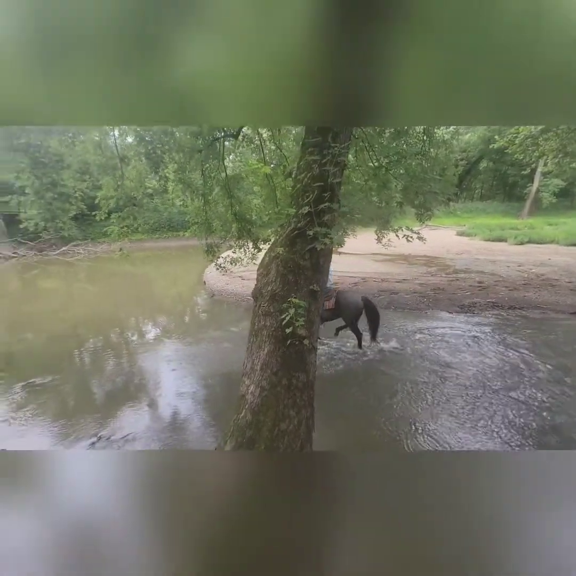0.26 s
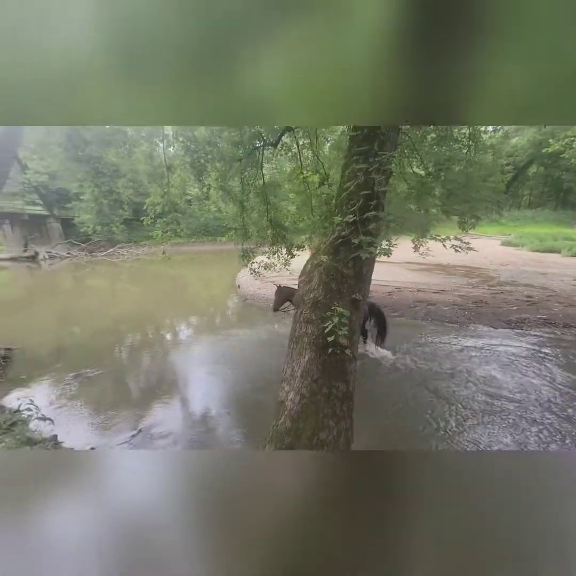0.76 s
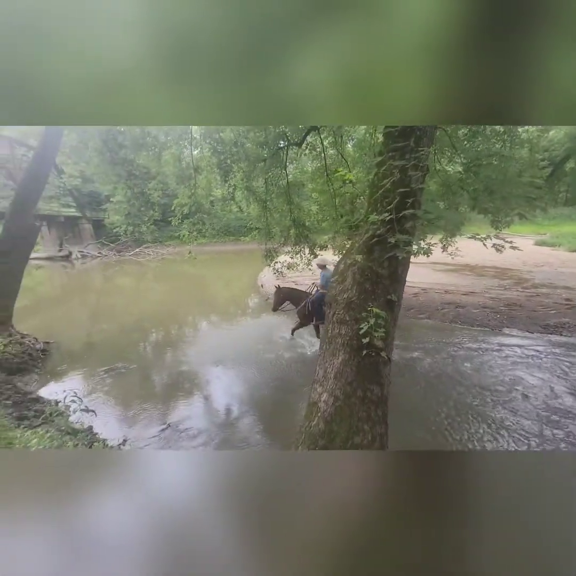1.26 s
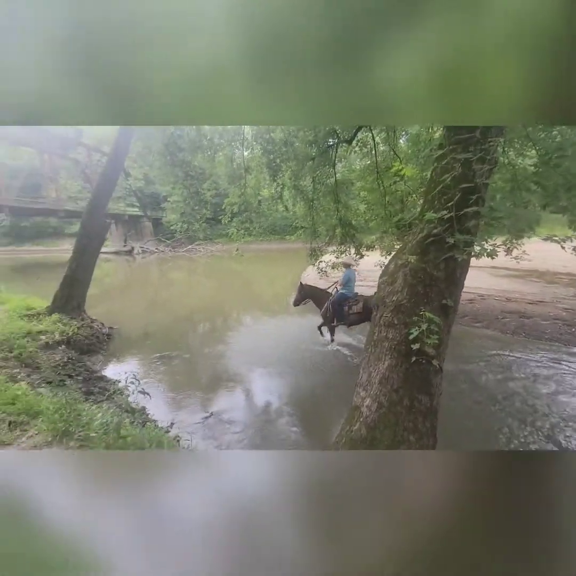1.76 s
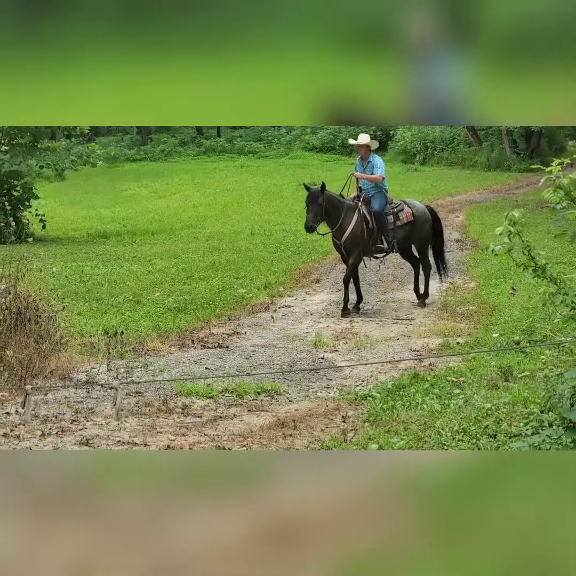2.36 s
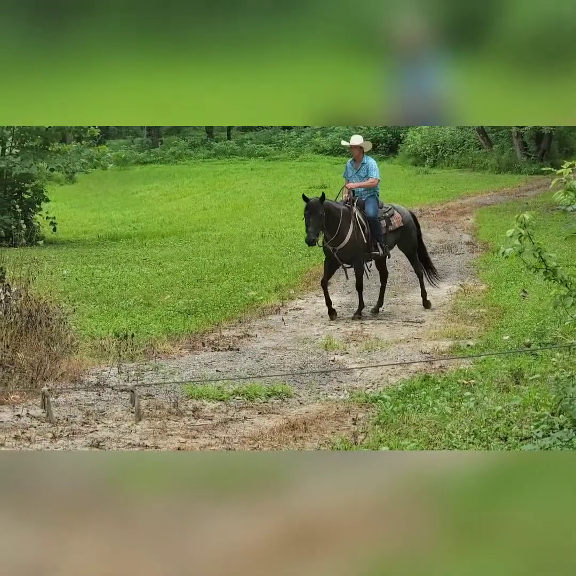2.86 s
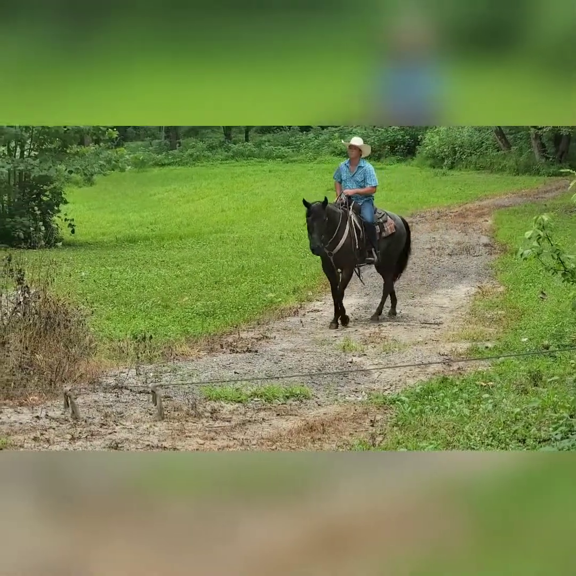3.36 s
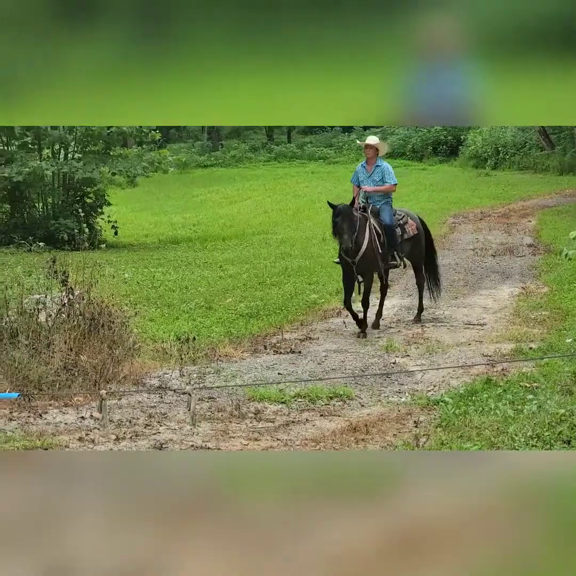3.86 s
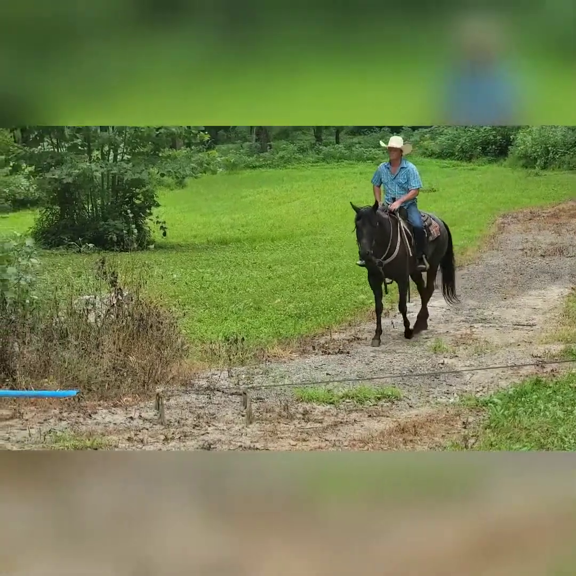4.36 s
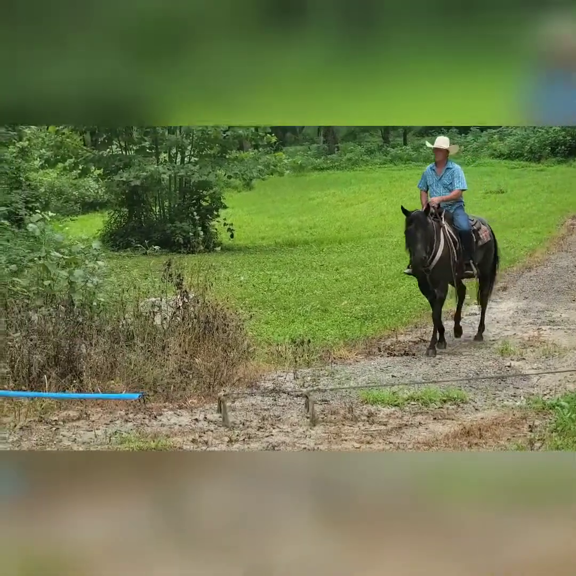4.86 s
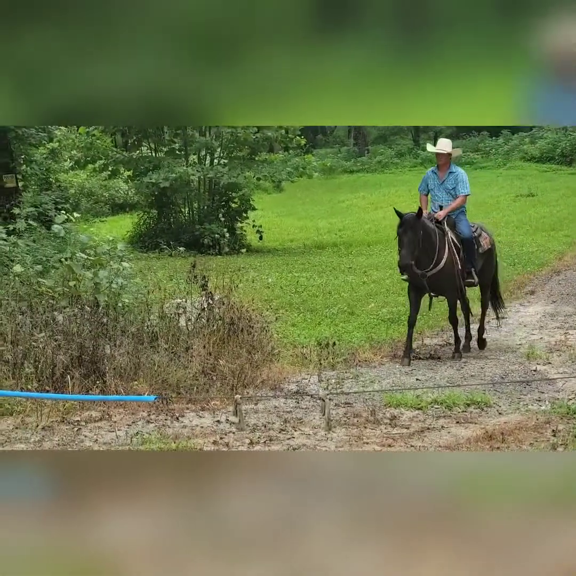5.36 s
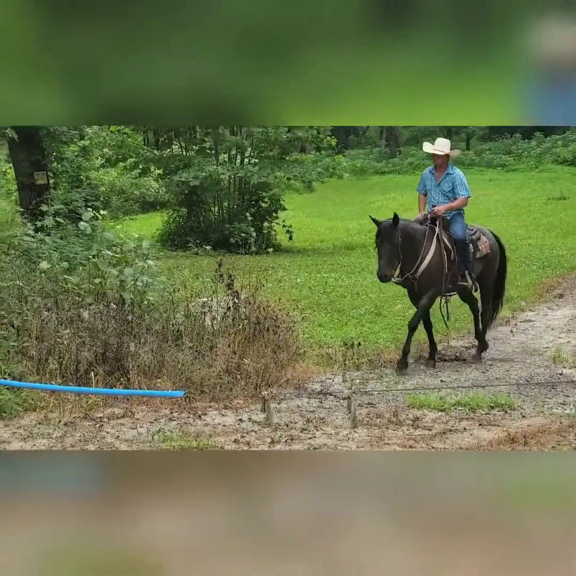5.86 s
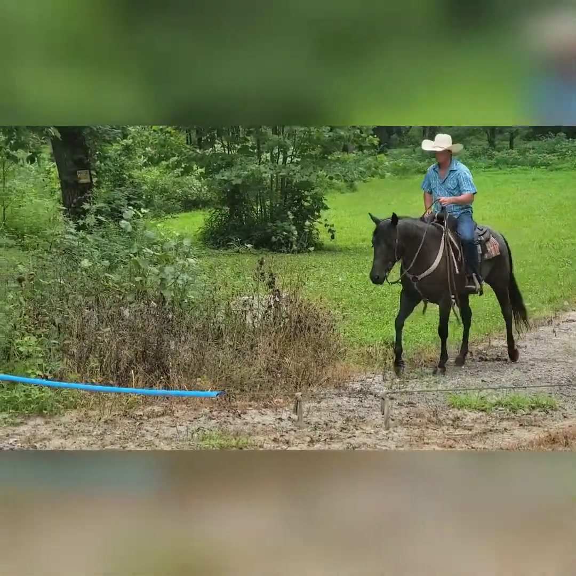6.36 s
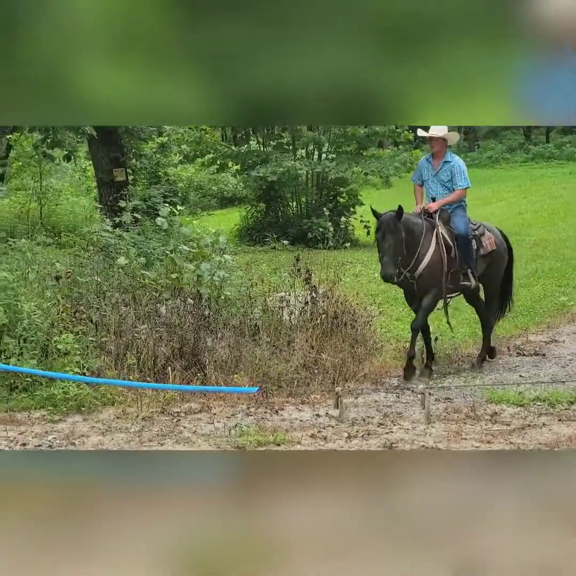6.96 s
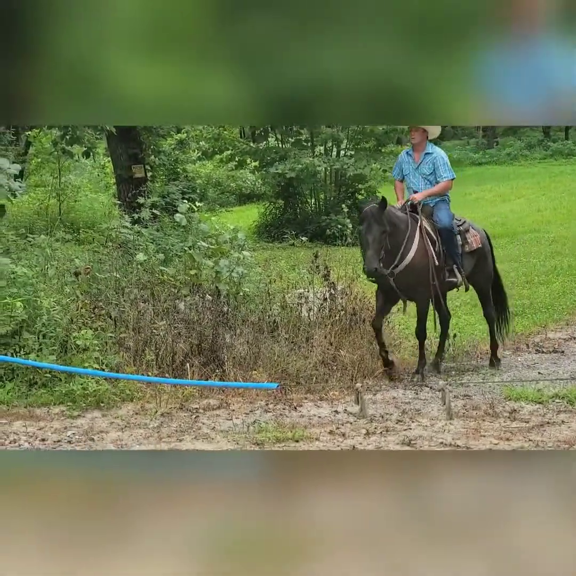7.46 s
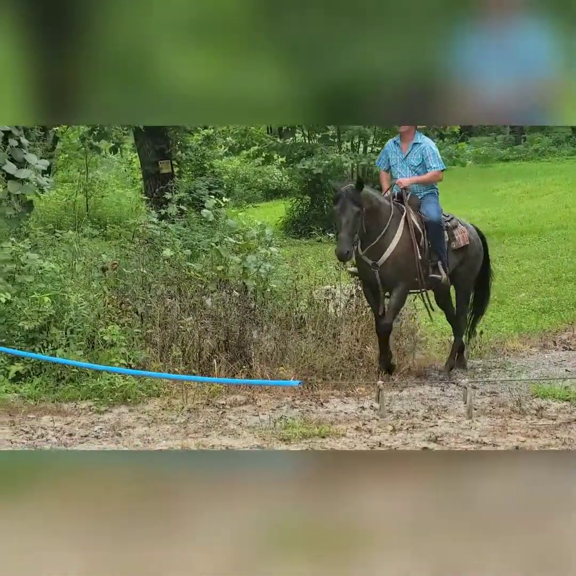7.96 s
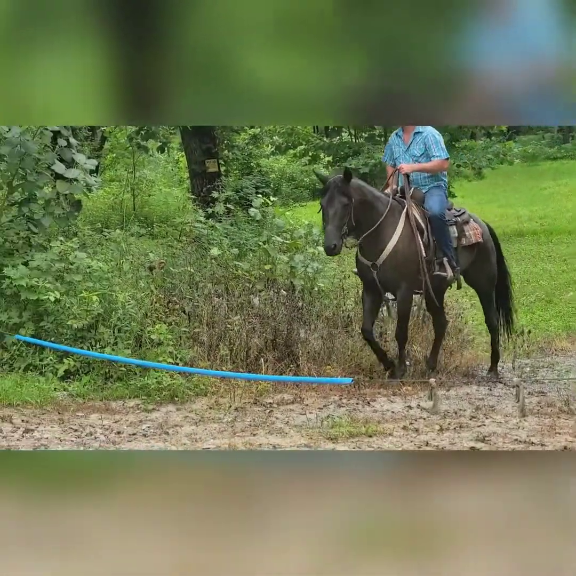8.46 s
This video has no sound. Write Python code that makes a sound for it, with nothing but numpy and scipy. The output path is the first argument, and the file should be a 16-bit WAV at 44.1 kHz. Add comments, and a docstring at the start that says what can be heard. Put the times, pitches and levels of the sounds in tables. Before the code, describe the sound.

Outdoors, a horse wades through a shallow creek with wide, busy splashes, hoof slaps, bubbly gulps and fizzing spray for nearly two seconds. A tiny silence follows, then much quieter, uneven hoof steps on a gritty dirt path grow closer and louder. A steady high insect buzz and faint distant engine rumble lie behind; stones snap, dry weeds brush, and a small bird whistles near the end.

```python
"""Horse from creek to path

A horse wades through a creek: bursts of coloured noise churn and spray, ringing bubbles gulp and fizz.
After a brief silence it walks up a gritty dirt path: each hoof is a crush of noise through resonances,
a short ring and a low thump, among snapping stones, scrapes and the noise of brushed dry weeds.
Pulsing noise makes the insects, low tones over a rumble a far engine, gliding sines a songbird and a hoot."""
import sys
import numpy as np
from scipy import signal
from scipy.fft import rfft, irfft, next_fast_len
from scipy.io import wavfile
from scipy.ndimage import uniform_filter1d, map_coordinates

SR = 44100
rng = np.random.default_rng(int(sys.argv[2]) if len(sys.argv) > 2 else 0)


def inscribe(sig):
    """Save sig as 16-bit PCM at rate SR to the path in sys.argv[1].

    A 1-D sig is mono; a 2-D sig holds one channel per row.
    Samples are clipped to [-1, 1] before scaling.
    """
    pcm = np.round(np.clip(np.atleast_2d(sig).T, -1, 1) * 32767)
    wavfile.write(sys.argv[1], SR, pcm.astype(np.int16))


N = 384536
CREEK_END_S, PATH_START_S = 1.799, 1.871


def amp(db):
    """Decibels to gain."""
    return np.exp(np.asarray(db) * np.log(10) / 20)


def unit(x):
    """Scale to rms 1."""
    return x / np.sqrt(np.mean(x ** 2) + 1e-20)


def along(points, hz):
    """Read a curve of (f/Hz, value) points on a log frequency axis."""
    f, v = np.transpose(points)
    return np.interp(np.log(hz + 1), np.log(f + 1), v)


def clock():
    """The time of each sample in seconds."""
    return np.arange(N) / SR


def wobble(rate):
    """A smooth random curve with rate knots a second."""
    s = np.arange(0, N, 16) / SR
    knots = rng.standard_normal(int(N * rate / SR) + 4)
    return np.interp(clock(), s, map_coordinates(knots, [s * rate]))


def filtered(x, response):
    """Multiply the spectrum of x by a response of frequency."""
    n = x.shape[-1]
    m = next_fast_len(n + SR // 8)
    return irfft(rfft(x, m) * response(np.fft.rfftfreq(m, 1 / SR)), m)[..., :n]


def resonances(modes, f):
    """Causal response of damped modes: (f/Hz, width/Hz, level/dB)."""
    return sum(amp(db) * 1j * f * w / (c * c - f * f + 1j * f * w) for c, w, db in modes)


def add(track, s, x):
    """Mix x into the track from time s; what falls outside is dropped."""
    start = round(s * SR)
    x = x[..., max(-start, 0):]
    part = track[..., max(start, 0):][..., :x.shape[-1]]
    part += x[..., :part.shape[-1]]


def noise():
    """Two channels of white noise."""
    return rng.standard_normal((2, N))


def grains(shape, rate, spread_db):
    """Random impulses of unequal size, about rate a second, rms 1."""
    hit = rng.random(shape) < rate / SR
    count = hit.size // 4
    size_db = spread_db * np.minimum(rng.exponential(size=count), 5)
    sizes = rng.standard_normal(count) * amp(size_db)
    out = np.zeros(shape)
    out[hit] = np.resize(sizes, hit.sum())
    return unit(out)


def spread(pair, spectrum, alike):
    """Colour two unrelated signals and blend them into left and right, rms 1."""
    def blend(hz):
        likeness = np.clip(along(alike, hz), -1, 1)
        return amp(along(spectrum, hz)) * np.sqrt([1 + likeness, 1 - likeness])
    mid, side = filtered(pair, blend)
    return unit(np.array([mid + side, mid - side]))


def swells(rows, rise, fall):
    """Power-summed gain of strokes that swell and die away: (peak t/s, level/dB, stretch in time)."""
    lead = 0.25  # each stroke is drawn from this many seconds before its peak
    power, t = np.zeros(N), np.arange(SR) / SR - lead
    for s, db, stretch in rows:
        age = np.where(t < 0, (t / (rise * stretch)) ** 2, t / (fall * stretch))
        stroke = amp(db) * np.exp(-np.minimum(age, 20))
        add(power, s - lead, stroke ** 2)
    return np.sqrt(power)


def cracks(rows, spectrum, life):
    """Short coloured noise bursts, each scaled to its peak: (t/s, level/dB)."""
    out, t = np.zeros(N), np.arange(SR // 12) / SR
    for s, db in rows:
        burst = rng.standard_normal(len(t)) * np.exp(-t / life) * (1 - np.exp(-2 * t / life))
        burst = np.pad(burst, (SR // 500, 0))  # 2 ms of room for the filter to ring ahead
        burst = filtered(burst, lambda hz: amp(along(spectrum, hz)))
        add(out, s - 1 / 500, amp(db) * burst / abs(burst).max())
    return out


def woods(x, t60):
    """Diffuse echo of trunks and banks: decaying noise that loses 60 dB in t60 seconds."""
    t = np.arange(SR // 2) / SR
    tail = rng.standard_normal((2, len(t))) * amp(-60 * t / t60) * (1 - np.exp(-t / 0.0009))
    return signal.fftconvolve(x[None], tail / np.linalg.norm(tail[0]), axes=1)[:, :N]


def bubbles(count, pitch_hz, cycles, spread_db):
    """A cloud of small ringing bubbles whose pitch rises as they surface."""
    t, out = np.arange(SR // 40) / SR, np.zeros((2, N))
    starts = rng.uniform(0, CREEK_END_S, count)
    octaves, sizes = rng.normal(size=count), rng.exponential(size=count)
    turns = rng.uniform(0, 2 * np.pi, count)  # the angle sets the left and right gains
    for when, octave, size, turn in zip(starts, octaves, sizes, turns):
        phase = t * np.clip(pitch_hz * 2 ** octave, 400, 9000)
        age = phase / cycles
        tone = np.sin(2 * np.pi * phase * (1 + 0.036 * np.minimum(age, 5)))
        ring = amp(spread_db * min(size, 4)) * np.exp(-age) * tone
        add(out, when, np.outer([np.cos(turn), np.sin(turn)], ring))
    return unit(out) * np.sqrt(CREEK_END_S * SR / N)  # rms 1 within the creek's own time


# legs sweeping through the water: (peak t/s, churn relative level/dB, spray relative level/dB)
STRIDES = [(.03, -36, -38), (.36, -36.5, -41.5), (.57, -42, -45.5), (.73, -44, -72), (1.0, -42, -47),
           (1.15, -63, -46.5), (1.388, -40.5, -46), (1.67, -36.5, -41.5), (1.78, -38, -49)]
CHURN_RISE_S, CHURN_FALL_S, SPRAY_RISE_S, SPRAY_FALL_S = 0.063, 0.065, 0.095, 0.15
SPRAY_LAG_S = 0.005  # thrown water lands after the surge
WASH_DB, DRIZZLE_DB = -45, -46.5  # floors under the strides: restless water and falling drops


def wading():
    """Gains of churned water and spray: each stride adds a surge to the restless water."""
    churn = swells([(s, db, 1) for s, db, _ in STRIDES], CHURN_RISE_S, CHURN_FALL_S)
    spray = swells([(s + SPRAY_LAG_S, db, 1) for s, _, db in STRIDES], SPRAY_RISE_S, SPRAY_FALL_S)
    return np.hypot(churn, amp(WASH_DB)), np.hypot(spray, amp(DRIZZLE_DB))


# hooves slapping the surface: (t/s, relative peak level/dB)
SLAP_HITS = [(0.018, -13.5), (0.136, -24), (0.38, -25.5), (0.678, -31), (0.727, -28.5), (0.867, -26.5),
             (0.992, -26.5), (1.148, -31), (1.402, -27), (1.662, -23)]
# colour of a slap: (f/Hz, relative level/dB)
SLAP_COLOUR = [(200, -21.5), (600, -8.5), (900, -5), (1200, 4.5), (1550, -8.5), (2200, -6), (3500, -15.5),
               (9000, -31.5), (15000, -21)]


def slaps():
    """Hooves slap the surface as short coloured bursts."""
    return amp(-2.5) * cracks(SLAP_HITS, SLAP_COLOUR, life=0.0051)


# air pockets that the legs drag under: (t/s, relative level/dB, starting f/Hz, break-up decay t/s)
AIR_POCKETS = [(.024, -29.5, 621, .056), (.045, -29, 267, 0.071), (.288, -34, 537, 0.029),
               (.382, -29.5, 470, 0.027), (.43, -35.5, 305, .043), (0.468, -35, 92.5, 0.038),
               (0.494, -27, 162, 0.014), (.559, -37.5, 615.4, 0.038), (0.725, -28.5, 398, 0.041),
               (.758, -30.5, 252, 0.031), (0.817, -40, 207, 0.051), (.919, -42, 486, 0.084),
               (0.973, -34, 300, 0.046), (.993, -28.5, 527, .01), (1.04, -26, 397, 0.029),
               (1.066, -27, 530, 0.026), (1.067, -26.5, 344, 0.02), (1.342, -33, 255, 0.04),
               (1.344, -35, 570, 0.03), (1.629, -38, 423, 0.046), (1.721, -33.5, 257, 0.029),
               (1.751, -36, 136, 0.035)]
# the water's colour for air pockets: (f/Hz, gain/dB)
POCKET_COLOUR = [(60, 0), (250, 2.5), (410, -2.5), (540, 4), (700, -5.5), (3000, 2.5)]


def plunges():
    """Each air pocket rings as one big bubble, then breaks into smaller ones."""
    out, t = np.zeros(N), np.arange(SR // 8) / SR
    for s, db, hz, life in AIR_POCKETS:
        age = t * hz / 1.06  # the ring dies within about a cycle
        tone = np.sin(2 * np.pi * hz * t * (1 + 0.014 * np.minimum(age, 5)))
        gulp = tone * np.exp(-age) * (1 - np.exp(-4 * age))
        breakup = grains(len(t), rate=1100, spread_db=2.5) * np.exp(-t / life)
        breakup *= 40 * life / np.linalg.norm(breakup)  # a long-lived pocket sheds more bubbles
        breakup[0] = 1
        pocket = signal.fftconvolve(breakup, gulp)
        pocket *= np.sqrt(life * SR / 2) / np.linalg.norm(pocket)
        add(out, s, amp(db - 3) * pocket)
    return filtered(out, lambda hz: amp(along(POCKET_COLOUR, hz)))


# colour of churned water: (f/Hz, relative level per Hz/dB)
CHURN_COLOUR = [(70, -23), (150, -10), (300, -6.5), (540, -3.5), (700, -6), (920, -12.5), (1290, 2.5),
                (1600, -8.5), (1850, -5.5), (2350, -3.5), (2750, -5.5), (3100, -12), (4500, -17),
                (7000, -38)]
# colour of spray: (f/Hz, relative level per Hz/dB)
SPRAY_COLOUR = [(1500, -39.5), (3000, 2), (4800, 0.5), (6400, 2.5), (7600, 0.5), (8200, -5), (10200, -12),
                (12500, -6), (14000, -3.5), (15800, -10)]
# balance of the creek: (f/Hz, left over right level/dB)
CREEK_PAN = [(100, 0), (380, -2.5), (700, -7), (1290, -2.5), (2380, 3.5), (4400, -4.5), (8000, 2),
             (15000, 1.5)]
# width of the creek: (f/Hz, left-right likeness from 0 to 1)
CREEK_ALIKE = [(130, 1), (250, 1), (400, 0.22), (700, 0.063), (1400, 0.028), (2400, 0), (4400, 0),
               (8000, 0.28), (14000, 0.62)]


def creek():
    """Churned water, falling drops, plunges and slaps, echoed by the banks."""
    surge, thrown = wading()
    churn = spread(noise() + grains((2, N), rate=2500, spread_db=0.5), CHURN_COLOUR, CREEK_ALIKE)
    churn *= surge * amp(1.36 + 0.9 * wobble(70))
    fizz = bubbles(count=600, pitch_hz=1925, cycles=7.9, spread_db=0.5) * surge * amp(-7)
    drips = bubbles(count=70, pitch_hz=1600, cycles=7, spread_db=2) * surge * amp(-6)
    gurgle = bubbles(count=60, pitch_hz=617, cycles=7, spread_db=2) * surge * amp(-11)
    spray = spread(noise() + grains((2, N), rate=5000, spread_db=1), SPRAY_COLOUR, CREEK_ALIKE)
    spray *= thrown * amp(2.5 + 0.81 * wobble(58.7))
    gulps = amp(-1) * plunges()
    smacks = slaps()
    echo = amp(-18) * woods(gulps, t60=0.17) + amp(1) * woods(smacks, t60=0.48)
    water = churn + gurgle + fizz + drips + spray + gulps + smacks + echo
    # steady low rumble and insect-coloured hiss behind the water
    air = amp(-59) * spread(noise(), RUMBLE_COLOUR, PATH_ALIKE)
    air += amp(-50.5) * spread(noise(), INSECT_COLOUR, CREEK_ALIKE)
    return filtered(water + air, lambda hz: amp(np.outer([.5, -.5], along(CREEK_PAN, hz))))


# colour of the insect chorus: (f/Hz, relative level per Hz/dB)
INSECT_COLOUR = [(4400, -47), (5200, -27.5), (5550, -18), (5850, -6.5), (6080, -1.5), (6210, 1.5),
                 (6350, -4.5), (6580, -4), (6850, -15), (7150, -22), (7800, -36), (11000, -89.5),
                 (12500, -39), (13500, -59)]


def insects():
    """A chorus of ringing tymbals: a narrow band of noise that pulses about 27 times a second."""
    beat = np.cumsum(26.9 + .1 * wobble(2)) / SR
    pulse_db = 1.2 * np.cos(2 * np.pi * beat)
    pulse_db += .65 * np.cos(4 * np.pi * beat) + .5 * np.cos(6 * np.pi * beat)
    chorus = spread(noise(), INSECT_COLOUR, [(6000, 0.11)])
    left_right = amp([[1.2], [-1.2]])
    return chorus * amp(-47.5 + pulse_db + 0.22 * wobble(7.7)) * left_right


# engine orders: (f/Hz, relative level/dB)
ENGINE_ORDERS = [(107.6, -55), (161.4, -66.5), (215.2, -63), (268, -71.5)]
# colour of the low rumble: (f/Hz, relative level per Hz/dB)
RUMBLE_COLOUR = [(15, -25.5), (30, -7.5), (45, -7), (58, 0.5), (80, 1.5), (125, -11), (190, -11),
                 (280, -19), (370, -24.5), (470, -34.5), (900, -47)]


def engine():
    """A far engine: slightly unsteady low orders over a rumble."""
    turning = np.cumsum(1 + 0.00429 * wobble(3)) / SR
    hum = np.zeros(N)
    for hz, db in ENGINE_ORDERS:
        flutter_db = 2 * wobble(9)
        hum += amp(db - 2 + flutter_db) * np.sin(2 * np.pi * hz * turning)
    return hum + amp(-57.5) * spread(noise(), RUMBLE_COLOUR, PATH_ALIKE)


# colour of the faint hiss: (f/Hz, relative level per Hz/dB)
HISS_COLOUR = [(500, -6.5), (3000, -14), (9500, -17.5), (12500, 4), (15500, 0)]


def hiss():
    """A faint steady bed of coloured noise."""
    return amp(-78) * spread(noise(), HISS_COLOUR, PATH_ALIKE)


# faint rustle along the path: (t/s, relative level/dB)
RUSTLE = [(1.9, -67), (2.4, -69), (3.0, -73), (6.4, -72.5), (7.5, -68.5), (8.7, -68)]
# colour of crumbling dirt: (f/Hz, relative level per Hz/dB)
DIRT_COLOUR = [(250, 8), (480, -1.5), (750, 6), (1300, 0.5), (1800, 3.5), (2900, -0.5), (4200, -0.5),
               (7500, -2.5), (10000, -65), (12500, -60), (15800, -34)]
# dirt crumbling under each hoof: level relative to the hoof row, swell and decay times
SCUFF_DB, SCUFF_RISE_S, SCUFF_FALL_S = -30, 0.014, 0.081


def scuff():
    """Dirt crumbles under each hoof, over a faint rustle: grainy noise of flickering level."""
    crumbs = (noise() + .35 * grains((2, N), rate=500, spread_db=2)) * amp(1.8 * wobble(22))
    crumbling = swells([(s, db + SCUFF_DB, 1) for s, db, *_ in HOOF_FALLS], SCUFF_RISE_S, SCUFF_FALL_S)
    rustle_db = np.interp(clock(), *np.transpose(RUSTLE))
    return np.hypot(amp(rustle_db + 4), crumbling) * spread(crumbs, DIRT_COLOUR, PATH_ALIKE)


# stones snapping under a shoe: (t/s, relative peak level/dB)
STONE_SNAPS = [(2.37, -43.5), (3.212, -53), (3.322, -39), (4.117, -43), (4.181, -35), (4.223, -24),
               (4.302, -43), (4.403, -48), (5.352, -46), (5.525, -47.5), (5.742, -48), (6.589, -52),
               (8.358, -45), (5.946, -43.5), (7.356, -34), (8.458, -38.5), (8.69, -30.5)]
# colour of a stone: (f/Hz, relative level per Hz/dB)
STONE_COLOUR = [(150, -32), (500, -6.5), (900, -6), (1400, -0.5), (2000, 0), (2800, -13), (4000, -15),
                (6000, -35), (15000, -38)]
PEBBLE_DB, PEBBLE_SPREAD_DB = -57, 5.5  # relative level of loose pebbles and its random spread


def pebbles(count):
    """Small stones click at random along the path: rows (t/s, relative level/dB)."""
    times = rng.uniform(PATH_START_S, N / SR, count)
    return np.column_stack([times, PEBBLE_DB + PEBBLE_SPREAD_DB * rng.standard_normal(count)])


def stones():
    """Stones snap and pebbles click as very short coloured bursts."""
    return amp(-1.5) * cracks([*STONE_SNAPS, *pebbles(count=28)], STONE_COLOUR, life=0.0014)


# tail and dry weeds brushing: (peak t/s, length t/s, relative level/dB)
BRUSH_STROKES = [(2.17, 0.032, -60), (2.23, 0.059, -54.5), (4.185, 0.046, -52.5), (4.643, .04, -65.5),
                 (6.012, 0.05, -57), (7.488, 0.046, -49), (7.531, 0.077, -52.5), (7.8, 0.032, -61.5),
                 (7.96, 0.065, -51), (8.04, 0.038, -46), (8.157, 0.087, -55.5), (8.287, .054, -52.5),
                 (8.53, .019, -42), (8.599, 0.027, -40.5), (8.633, 0.034, -41)]
# colour of dry weeds: (f/Hz, relative level per Hz/dB)
WEED_COLOUR = [(800, -10.5), (1300, -7.5), (1850, 3), (2200, -8), (3100, -13), (4200, 0), (7600, 3.5),
               (10000, 1), (13000, -0.5), (15500, 5)]
SWISH_RISE = 0.43  # swell time as a share of the length
SAND_RISE_S, SAND_FALL_S = 0.0063, 0.051


def swishes():
    """Brushing strokes swell and die away; each hoof adds a hiss of kicked sand."""
    stroke = swells([(s, db, length) for s, length, db in BRUSH_STROKES], SWISH_RISE, 1)
    kicks = [(s + SAND_RISE_S, db, 1) for s, _, _, db, _ in HOOF_FALLS]
    sand = swells(kicks, SAND_RISE_S, SAND_FALL_S)
    brush = spread(noise() + grains((2, N), rate=3000, spread_db=1.2), WEED_COLOUR, PATH_ALIKE)
    return np.hypot(stroke, sand) * amp(2.3 * wobble(90)) * brush


# a hoof dragged over gravel: (middle t/s, half length t/s, relative level/dB)
GRAVEL_DRAGS = [(2.259, 0.023, -62.5), (4.139, 0.045, -58), (4.191, 0.016, -55), (4.283, .04, -69),
                (4.96, 0.14, -65.5), (5.15, 0.077, -61.5), (7.394, 0.063, -62.5), (8.624, 0.054, -56)]
# colour of gravel: (f/Hz, relative level per Hz/dB)
GRAVEL_COLOUR = [(200, -22), (550, 0), (1100, -1), (1500, 1), (2050, 1), (2600, -5.5), (4200, -19),
                 (9000, -37)]


def scrapes():
    """A hoof drags over gravel: grainy noise under smooth bell-shaped swells."""
    drag = np.zeros(N)
    for s, half_length, db in GRAVEL_DRAGS:
        drag += amp(db) * np.exp(-np.minimum(((clock() - s) / half_length) ** 2, 20))
    grind = 0.78 * noise()[0] + grains(N, rate=500, spread_db=-0.5)
    return drag * unit(filtered(grind, lambda hz: amp(along(GRAVEL_COLOUR, hz))))


# hoof falls: (t/s, relative level/dB, thud relative level/dB, kicked sand relative level/dB, ring f/Hz)
HOOF_FALLS = [(2.461, -45.5, -64, -68, 1086), (2.492, -54, -63, -78, 1040), (2.693, -46, -44, -65.5, 980),
              (3.05, -50.5, -62, -67, 950), (3.111, -52.5, -58, -85, 860), (3.318, -48.5, -46.5, -67, 730),
              (3.393, -47.5, -66, -81, 682), (3.623, -53.5, -67, -75, 575), (3.677, -50, -68, -86, 570),
              (3.883, -50, -49, -67, 775), (4.477, -47, -50.5, -68, 680), (4.559, -52.5, -52, -76, 730),
              (4.783, -38, -48.5, -61, 890), (5.067, -37.5, -50, -58.5, 924),
              (5.37, -47.5, -53, -58.5, 1126), (5.64, -53, -60, -68, 920), (5.708, -50, -70, -83, 970),
              (5.964, -36, -51, -72, 1046), (6.206, -42.5, -51, -60, 943), (6.531, -43.5, -62, -55.5, 1230),
              (6.805, -47, -49, -63, 690), (7.094, -42, -59, -64, 1020), (7.186, -42.5, -69, -79, 1054),
              (7.237, -35.5, -70, -67, 1006), (7.354, -36, -65, -50.5, 1270),
              (7.644, -43, -49.5, -56, 1224), (7.91, -35, -47, -48, 1010), (8.428, -32, -35.5, -53.5, 1087),
              (8.692, -34.5, -39, -55, 1100)]
# hoof on packed dirt, varied at each fall: (f/Hz, width f/Hz, relative level/dB)
HOOF_MODES = [(319, 98, -3), (602, 210, -10), (817, 160, -6.5), (1091, 116, -3), (1750, 115, -0.5)]
# colour of grit: (f/Hz, relative level per Hz/dB)
GRIT_COLOUR = [(800, 1), (1800, 5.5), (2900, -7.5), (4300, 1.5), (8500, -7), (11000, -44), (15500, -13.5)]
CONTACT_S, GRIT_DB = 0.0053, -4.5  # time to take the weight; grit relative to the hoof row
TOE_S, TOE_DB = (0.0091, 0.023), -12  # the toe follows the heel: delay range, relative level
THUD_HZ, THUD_LAG_S = 148, 0.0039  # starting pitch of the thump; weight arrives after the first touch
GRAZE_S, GRAZE_DB = 0.012, -14  # the shoe grazes the grit before it lands: longest lead, relative level


def hooves():
    """Each hoof rolls heel to toe onto the grit, rings hollowly and thumps the ground."""
    out, t = np.zeros(N), np.arange(SR // 6) / SR
    press = (1 - np.exp(-2 * t / CONTACT_S)) * np.exp(-t / CONTACT_S)
    thud = np.sin(2 * np.pi * THUD_HZ * t / (1 + 8 * t)) * np.exp(-t / 0.0042) * (1 - np.exp(-t / 0.00094))
    for s, db, thud_db, _, ring_hz in HOOF_FALLS:
        load = press + 0.015 * np.exp(-t / 0.077)
        add(load, rng.uniform(*TOE_S), amp(TOE_DB) * press)
        crush = (rng.standard_normal(len(t)) + 0.69 * grains(len(t), rate=1800, spread_db=-2.5)) * load
        modes = [(hz * (1 + 0.031 * rng.normal()), width, level + 2 * rng.normal())
                 for hz, width, level in HOOF_MODES]
        clop = filtered(crush, lambda f: resonances(modes, f) / (1 + (f / 2300) ** 8))
        clop /= abs(clop).max()
        ring = press * np.sin(2 * np.pi * ring_hz * t)
        grit = rng.standard_normal(len(t)) * np.exp(-t / 0.011)
        grit = filtered(grit, lambda f: amp(along(GRIT_COLOUR, f)))
        grit /= abs(grit).max()
        add(out, s, amp(db) * (amp(-1.44) * clop + amp(2.3) * ring + amp(GRIT_DB) * grit))
        add(out, s + THUD_LAG_S, amp(thud_db + 9.5) * thud)
        add(out, s - GRAZE_S * rng.uniform(0.492, 1), amp(db + GRAZE_DB) * clop)
    return out


# width of the path: (f/Hz, left-right likeness from 0 to 1)
PATH_ALIKE = [(60, 0.9), (130, 0.75), (290, 0.72), (640, 0.52), (1400, 0.17), (3100, 0.24), (7000, 0.87),
              (14000, 0.91)]


def walk():
    """Hooves, stones, scrapes and crumbling dirt a little to the right, plus brushed weeds."""
    blows = hooves() + stones() + scrapes()
    near = blows * amp([[-.6], [.6]]) + amp(-10) * woods(blows, t60=0.43) + scuff()
    lag = 0.00006  # the left channel hears the horse later (s)
    return filtered(near, lambda hz: np.exp(np.outer([-1j, 1j], np.pi * hz * lag))) + swishes()


HOOT_S, HOOT_HZ, HOOT_DB, HOOT_HALF_S = 5.748, 390, -59.5, 0.019


def hoot():
    """One faint, soft, low tone among the steps: a sine in a bell-shaped swell."""
    t = clock() - HOOT_S
    swell = np.exp(-np.minimum((t / HOOT_HALF_S) ** 2, 20))
    return amp(HOOT_DB) * swell * np.sin(2 * np.pi * HOOT_HZ * t)


# the bird's four kinds of note: (share of the note, f/Hz, relative level/dB)
LEVEL_NOTE = [(0, 3500, -5), (.4, 3700, 3.5), (1, 3780, -6)]
DIP_NOTE = [(0, 5550, 3), (.5, 4090, -4.5), (1, 5500, -6)]
FALL_NOTE = [(0, 5700, 5), (.15, 4680, -3.5), (.33, 4170, -1.5), (.55, 4030, -11.5), (1, 4020, -26)]
ARCH_NOTE = [(0, 4840, -8), (.08, 3200, -10), (.21, 3780, -15), (.3, 4340, 3.5), (.44, 5250, -6),
             (.53, 3400, -3.5), (.68, 3210, -17), (1, 2650, -32)]
# the bird's phrase: (t/s, length t/s, relative level/dB, kind of note)
PHRASE = [(6.962, .1, -68, LEVEL_NOTE), (7.087, 0.045, -51.5, DIP_NOTE), (7.208, .115, -63.5, LEVEL_NOTE),
          (7.348, 0.047, -49, DIP_NOTE), (7.624, .155, -45, FALL_NOTE), (7.847, .2, -46, ARCH_NOTE),
          (8.117, .2, -50, ARCH_NOTE)]


def bird():
    """Gliding whistles with a fine tremble, echoing among the trees."""
    song = np.zeros(N)
    tremble = 1 + .012 * wobble(300)
    for s, length, level_db, note in PHRASE:
        share, hz, db = np.transpose(note)
        t = np.arange(0, length, 1 / SR)
        fade = np.clip(np.minimum(t, length - t) / 0.0019, 0, 1)
        glide = uniform_filter1d(np.interp(t / length, share, hz), size=400)
        pitch = glide * tremble[round(s * SR):][:len(t)]
        loudness = amp(level_db + np.interp(t / length, share, db))
        add(song, s, fade * loudness * np.sin(2 * np.pi * np.cumsum(pitch) / SR))
    song *= amp(2.5 * wobble(60))  # the whistle wavers in level
    return song + woods(song, t60=0.22)


def scene():
    """The creek, a moment of silence, then the path."""
    t = clock()
    at_creek = np.exp(-np.maximum(t - CREEK_END_S, 0) / 0.0029)
    on_path = t > PATH_START_S
    path = insects() + engine() + hiss() + walk() + hoot() + bird()
    return creek() * at_creek + path * on_path


TOP_HZ = 15800


def record(dry):
    """A very steep roll-off at the band limit."""
    return filtered(dry, lambda hz: 1 / (1 + (hz / TOP_HZ) ** 400))


dry = scene()
out = record(dry)
inscribe(out)
```